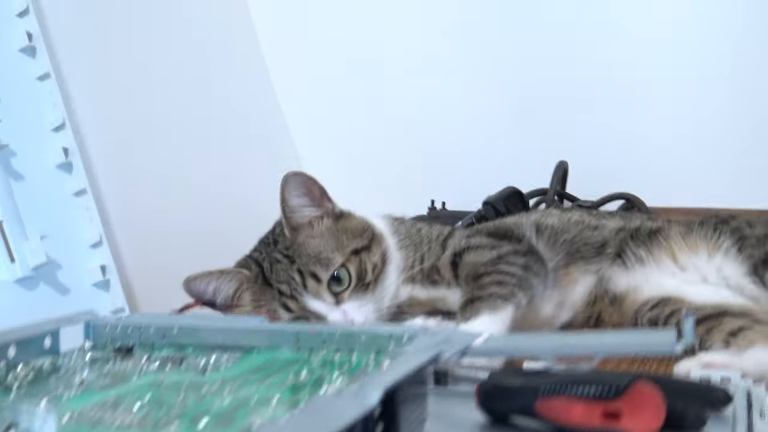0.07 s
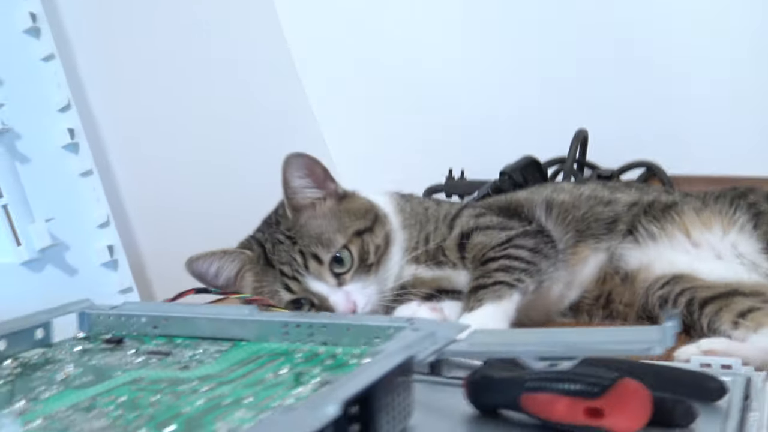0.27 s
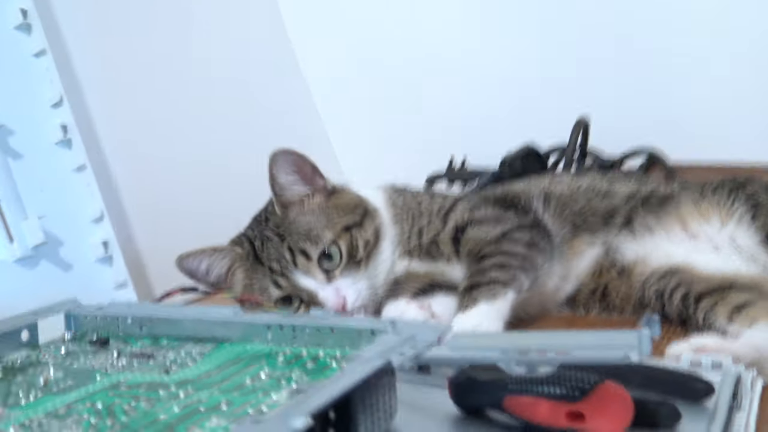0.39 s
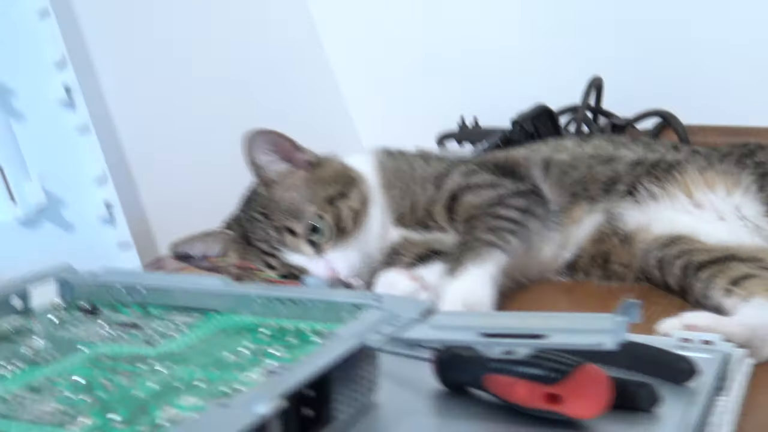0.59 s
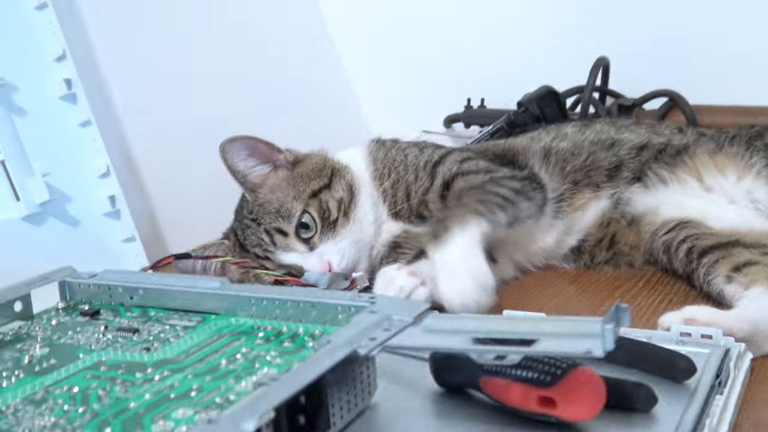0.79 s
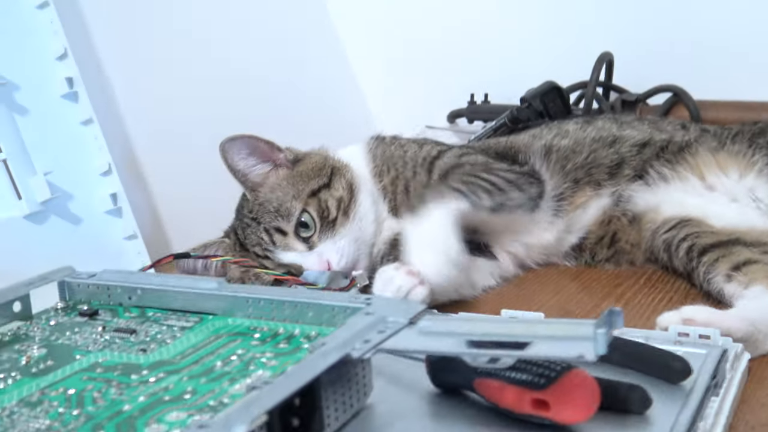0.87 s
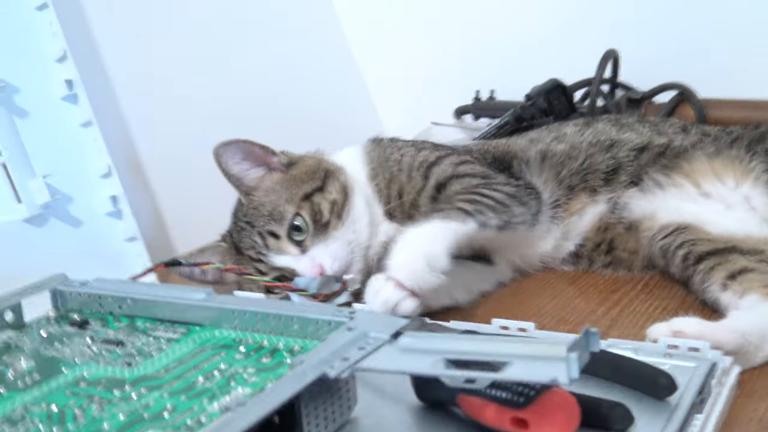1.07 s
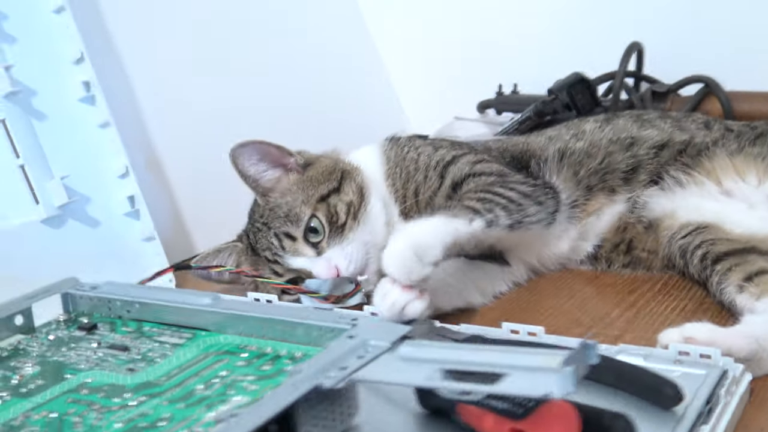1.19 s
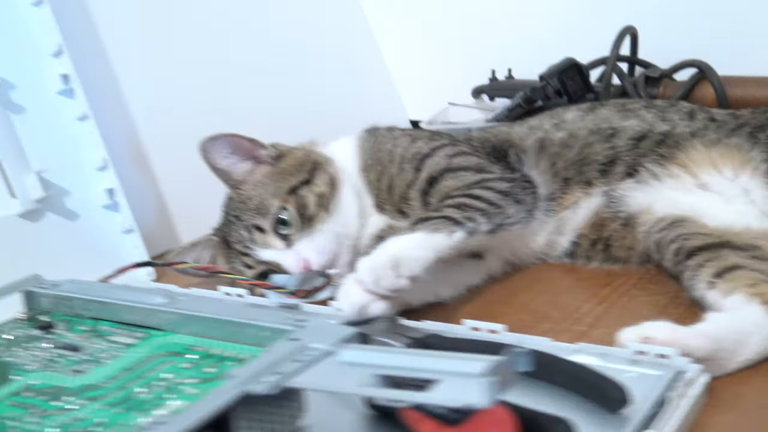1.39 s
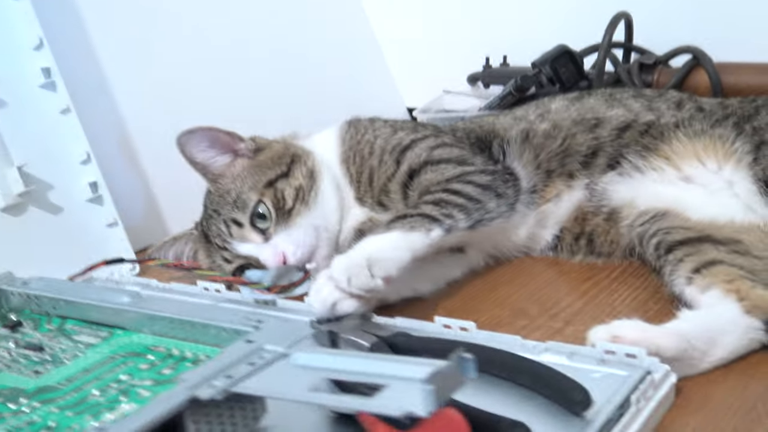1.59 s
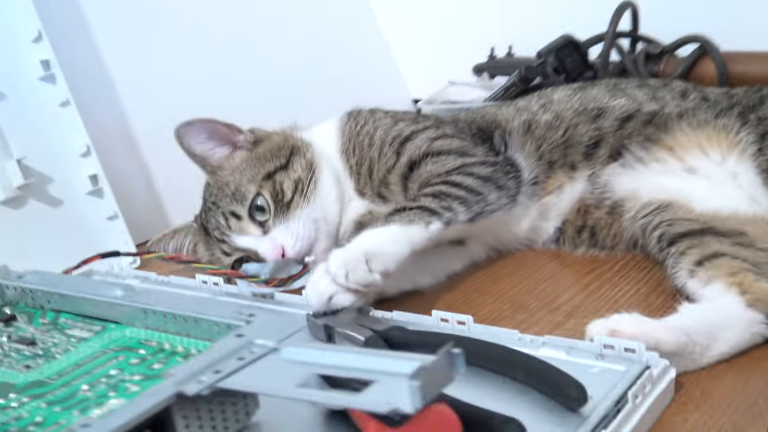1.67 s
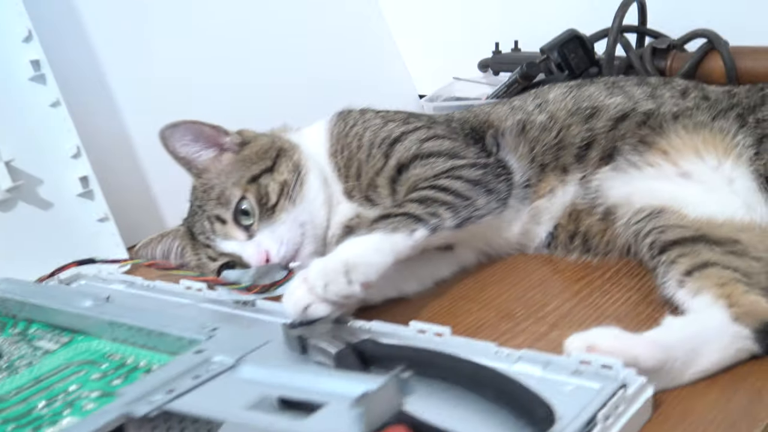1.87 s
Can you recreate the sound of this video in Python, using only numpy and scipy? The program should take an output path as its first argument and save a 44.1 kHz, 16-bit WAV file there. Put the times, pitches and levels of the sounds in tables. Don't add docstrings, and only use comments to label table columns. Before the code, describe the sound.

A sharp, bright metallic snap at 0.2 s, by far the loudest, rings for only milliseconds with slight room echo. Tiny wire ticks follow around 0.35, 0.55 and 0.8. At 0.9-1.0 a paw drags with a low, furry scuff, then hollow plastic taps at 1.04. Dull padded desk knocks come at 1.6 and 1.7. Beneath: soft hum, hiss, rustle, distant fan and faint high pulsing motor whine.

```python
import sys
import numpy as np
from scipy import signal
from scipy.fft import rfft, irfft
from scipy.io import wavfile
from scipy.ndimage import uniform_filter1d

SR = 44100
rng = np.random.default_rng(int(sys.argv[2]) if len(sys.argv) > 2 else 0)


def elevation(decibels):
    levels = np.asarray(decibels, float)
    return 10 ** (levels / 20)


def to_wav(s):
    ch = np.atleast_2d(s).T
    pcm = np.round(np.clip(ch, -1, 1) * 32767)
    wavfile.write(sys.argv[1], SR, pcm.astype(np.int16))


N = 83790
LEAN_DB = np.array([[-0.5], [0.5]])


def evened(x):
    return x / np.sqrt(np.mean(x ** 2) + 1e-20)


def read(points, hz):
    f, value = np.transpose(points)
    return np.interp(np.log(hz + 1), np.log(f + 1), value)


def curve(points):
    return np.interp(np.arange(N) / SR, *np.transpose(points))


def add(mix, start_s, sound):
    part = mix[round(start_s * SR):][:len(sound)]
    part += sound[:len(part)]


def coloured(x, points):
    hz = np.fft.rfftfreq(x.shape[-1], 1 / SR)
    return irfft(rfft(x) * elevation(read(points, hz)), x.shape[-1])


def ring(modes, rise_s, tilt_db=0, sag=0):
    sag_s = 0.0031
    t = np.arange(5000) / SR
    bent = t + sag * sag_s * (1 - np.exp(-t / sag_s))
    pivot_hz = modes[min(1, len(modes) - 1)][0]
    x = np.zeros(len(t))
    for hz, db, t60_s in modes:
        level_db = db + tilt_db * np.log2(abs(hz) / pivot_hz)
        x += elevation(level_db - 60 * t / t60_s) * np.sin(2 * np.pi * hz * bent)
    x = x * np.sin(np.pi / 2 * np.minimum(t / rise_s, 1)) ** 2
    return x / abs(x).max()


def hiss(points, patch_db, swell_db):
    # f/Hz, correlation
    likeness = [(30, 1), (70, 0.96), (200, 0.66), (700, 0.87), (1500, 0.72), (2500, 0.81), (4600, 0.96),
                (5600, 0.3), (15000, 0.91)]
    count, hz = N // 256 + 5, np.fft.rfftfreq(1024, 1 / SR)
    a, b, c, d, patches = rng.standard_normal((count, 513, 5)).T
    patches = uniform_filter1d(patches, size=12, axis=0)
    patches = evened(uniform_filter1d(patches, size=10, axis=1))
    swell = evened(uniform_filter1d(rng.standard_normal(count), size=6))
    same = np.clip(read(likeness, hz), -1, 1)[:, None]
    left = a + 1j * b
    right = same * left + np.sqrt(1 - same ** 2) * (c + 1j * d)
    level_db = read(points, hz)[:, None] + patch_db * patches + swell_db * swell
    z = np.array([left, right]) * elevation(level_db)
    return evened(signal.istft(z, nperseg=1024, noverlap=768)[1][:, :N])


def room_hum():
    # f/Hz, density/dB
    hum_colour = [(20, -12.5), (45, 2), (150, 0.5), (310, -0.5), (450, -3.5), (900, -3.5), (1500, -14),
                  (3500, -17.5), (16000, -18.5)]
    return elevation(-63.5) * hiss(hum_colour, patch_db=1.27, swell_db=0.6)


def rustle():
    # t/s, level/dB
    rustle_level = [(0, -77), (.2, -66.5), (.5, -69.5), (.8, -67), (.9, -61), (1.08, -73.5), (1.25, -78.5),
                    (1.9, -81)]
    # f/Hz, density/dB
    rustle_colour = [(300, 1), (1000, 2), (2500, -13), (6000, -5), (12000, -12.5)]
    return elevation(curve(rustle_level)) * hiss(rustle_colour, patch_db=2.5, swell_db=1.5)


def fan():
    centre_hz, width_hz, level_db = 1164, 40, -74
    t, r = np.arange(N) / SR, np.exp(-np.pi * width_hz / SR)
    z = signal.lfilter([1 - r], [1, -r], rng.standard_normal((N, 2)) @ [1, 1j])
    return elevation(level_db) * evened((z * np.exp(2j * np.pi * centre_hz * t)).real)


def lens_motor():
    # multiple of step tone, level/dB, end t/s
    motor_orders = [(4, -77.5, 0.77), (5, -74.5, 0.77), (6, -80, .76), (7, -87, 0.56)]
    # t/s, level/dB
    motor_load = [(0, -5.5), (.2, 0), (.4, 1.5), (.7, 0), (1.1, 9)]
    tone_hz, steps_per_s, step_on, first_step_s = 1620, 25, 0.45, 0.0005
    t = np.arange(N) / SR
    phase = (t - first_step_s) * steps_per_s
    on = uniform_filter1d(1. * (phase % 1 < step_on), size=90)
    luck = rng.standard_normal((60, 5))[phase.astype(int)]
    turns = np.cumsum(tone_hz * (1 + 0.00084 * luck[:, 4])) / SR
    whine = np.zeros(N)
    for i, (k, db, end_s) in enumerate(motor_orders):
        level_db = db + 1.1 * luck[:, i] - 23 * (t > end_s)
        whine += elevation(level_db) * np.sqrt(2) * np.sin(2 * np.pi * k * turns + i)
    return elevation(curve(motor_load)) * on * whine


def walls(x):
    # f/Hz, t60/s
    wall_decay = [(300, 0.31), (1200, 0.27), (3000, 0.28), (6500, 0.32), (12000, 0.3)]
    # f/Hz, level/dB
    wall_colour = [(300, -1.5), (3500, 7.5), (5300, -1), (6400, 5), (7500, 2), (12000, -7)]
    at = np.arange(120, 22000, 20) + rng.integers(0, 20, (2, 1094))
    taps = np.zeros((2, 22050))
    np.put_along_axis(taps, at, rng.choice([-1., 1.], at.shape), 1)
    taps = np.array([taps[0], 1.08 * taps[0] + 0.5 * taps[1]])
    hz, t, z = signal.stft(taps, SR, nperseg=256)
    tail = signal.istft(z * elevation(-60 * t / read(wall_decay, hz)[:, None]), SR, nperseg=256)[1]
    echo = signal.fftconvolve(x[None], tail / np.linalg.norm(tail[0]), axes=1)[:, :N]
    return elevation(-21) * coloured(echo, wall_colour)


def ports(x):
    # f/Hz, level/dB
    side_level = [(200, -17), (1000, -12.5), (2500, -22), (4500, -17), (6500, -16.5), (9000, -8),
                  (15000, -7)]
    turned = signal.hilbert(x).imag
    side = coloured(0.97 * turned - 0.17 * x, side_level)
    return np.array([x + side, x - side]) * elevation(LEAN_DB)


def drag():
    # t/s, level/dB
    pressure = [(.893, -77), (.902, -55), (.912, -45), (.92, -40.5), (.945, -40.5), (.968, -39),
                (.985, -43.5), (.993, -56), (1.005, -73)]
    # f/Hz, level/dB, t60/s
    board_modes = [(114, -13, 0.028), (167, -4, 0.053), (219, 0, 0.04), (303, 0, 0.051), (367, -2, 0.027),
                   (432, -4, 0.046), (494, 1, 0.06), (720, -16, 0.033)]
    # f/Hz, density/dB
    fur_colour = [(500, -39), (758, -1), (1310, -5.5), (1930, -6.5), (4800, -17), (6500, -12),
                  (8000, -16.5), (10000, -17.5), (16000, -35)]
    # t/s, peak/dB, f/Hz
    catch_events = [
        (0.9002, -45.5, 244),
        (.917, -32, 161.5),
        (0.9283, -32, 267),
        (.938, -40, 456),
        (.9475, -49, 162),
        (0.9546, -35.5, 165),
        (.962, -33, 193),
        (0.9793, -41.5, 412),
    ]
    slips_per_s, slip_spread_db, fur_spread_db = 1100, 2.5, 2.0
    board_db, fur_db, fur_share = -2, -7.5, 0.46
    start, end = (pressure[0][0] - 0.015, -90), (pressure[-1][0] + 0.0059, -90)
    db = curve([start] + list(pressure) + [end])
    top_db = db.max()
    slips = rng.standard_normal(N) * elevation(slip_spread_db * rng.exponential(1, N))
    slips = slips * (rng.random(N) < slips_per_s / SR)
    board = evened(signal.fftconvolve(slips, ring(board_modes, rise_s=0.00076))[:N])
    crackle = rng.standard_normal(N) * elevation(fur_spread_db * rng.exponential(1, N))
    fur = evened(coloured(crackle, fur_colour))
    catches = np.zeros(N)
    for s, peak_db, hz in catch_events:
        add(catches, s, -elevation(peak_db) * ring([(hz, 0, 0.039)], rise_s=0.0049))
    fur_level_db = top_db + fur_share * (db - top_db) + fur_db
    return catches + board * elevation(db + board_db) + fur * elevation(fur_level_db)


def knocks():
    # t/s, peak/dB, tilt/(dB/octave)
    knock_events = [
        (1.599, -44, 6),
        (1.6029, -30, 1.5),
        (1.6905, -40, -2),
        (1.805, -54, -6),
    ]
    # f/Hz, level/dB, t60/s
    desk_modes = [(150, -6.5, 0.045), (279, 6, 0.05), (489, 1, 0.033), (755, -15.5, 0.038),
                  (960, -13, 0.05), (1450, -19, 0.035), (2310, -28, 0.01)]
    out = np.zeros(N)
    for s, db, tilt_db in knock_events:
        add(out, s, -elevation(db) * ring(desk_modes, 0.0022, tilt_db, sag=0.54))
    return out


def plastic_taps():
    # t/s, peak/dB, tilt/(dB/octave)
    tap_events = [
        (1.030, -44.5, 6.5),
        (1.0364, -36.5, 0.5),
        (1.047, -44, 5),
        (1.053, -50.5, 1),
        (1.430, -62, 10),
    ]
    # f/Hz, level/dB, t60/s
    part_modes = [(781, 1.5, 0.026), (911, 3.5, 0.03), (1202, 1, 0.036), (1500, -0.5, 0.03),
                  (2080, -14, 0.027), (2904, -10, 0.021), (3770, -18, 0.02), (4660, -16, 0.013)]
    # f/Hz, level/dB, t60/s
    tube_modes = [(921, 0, .05), (1500, -2, .035)]
    out = np.zeros(N)
    add(out, 1.4290, elevation(-48) * ring(tube_modes, rise_s=0.003))
    for s, db, tilt_db in tap_events:
        add(out, s, elevation(db) * ring(part_modes, 0.0024, tilt_db))
    return out


def tick(hz, width_hz, t60_s):
    t = np.arange(2000) / SR
    crackle = rng.standard_normal(2000) * elevation(-60 * t / t60_s) * np.minimum(t / 0.00054, 1)
    crackle[8] += 2.8
    r = np.exp(-np.pi * width_hz / SR)
    poles = [1, -2 * r * np.cos(2 * np.pi * hz / SR), r * r]
    for _ in range(2):
        crackle = signal.lfilter([1, 0, -1], poles, crackle)
    return crackle / abs(crackle).max()


def wire_ticks():
    # t/s, peak/dB, centre f/Hz, width/Hz, t60/s
    tick_events = [(0.2085, -19.5, 5950, 8900, 0.005), (.2095, -37.5, 4800, 8850, 0.15),
                   (.125, -57, 4000, 5000, 0.027), (0.327, -54.5, 1780, 2000, 0.074),
                   (0.3621, -46.5, 3509, 3000, 0.0087), (0.5424, -47.5, 1870, 1500, 0.013),
                   (0.541, -50, 5500, 7000, 0.0065), (0.816, -38.5, 4540, 2800, 0.014),
                   (0.8164, -39, 7800, 3020, 0.012), (0.817, -44.5, 1580, 1500, 0.025),
                   (.8745, -49, 7900, 6000, 0.006), (0.8898, -44, 7500, 6000, 0.0047),
                   (.8997, -49, 6300, 7000, .01), (0.9075, -48, 7000, 7000, 0.0072),
                   (.9162, -43, 2500, 4000, 0.014), (.918, -50, 6700, 1500, .01),
                   (1, -35, 6900, 5870, 0.014), (0.9979, -44.5, 3000, 3000, 0.025),
                   (1.025, -52.5, 8500, 3000, 0.029), (1.577, -48, 2370, 2460, 0.039),
                   (1.5774, -51.5, 6250, 4000, 0.019), (1.6076, -52.5, 6650, 1500, 0.011),
                   (1.604, -49, 2200, 2500, 0.04), (1.644, -43, 3770, 2950, 0.011),
                   (1.72, -60, 2500, 2950, 0.011), (1.8674, -49.5, 980, 500, 0.022),
                   (1.373, -64, 1183, 120, 0.044), (0.327, -53, 1150, 250, 0.071),
                   (.736, -48, 248, 500, 0.022), (0.834, -55.5, 198, 295, 0.36),
                   (1.029, -47.5, 350, 400, 0.017)]
    out = np.zeros(N)
    for s, db, hz, width_hz, t60_s in tick_events:
        add(out, s, elevation(db) * tick(hz, width_hz, t60_s))
    return out


def snap():
    # f/Hz (minus: first swing inward), level/dB, t60/s
    frame_modes = [(825, -33.5, 0.065), (988, -16.5, 0.016), (1244, -15.5, 0.022), (2987, -22.5, 0.026),
                   (3271, -15.5, 0.013), (3849, -11.5, 0.012), (4923, -16, .012), (6481, 3.5, 0.0047),
                   (-7250, -10.5, 0.0061), (8308, -9.5, 0.0036), (10462, -11, 0.0046),
                   (-11700, -7.5, 0.0042), (15640, -21, 0.0046)]
    snap_s, snap_db, crack_db, cut_hz = 0.2081, -7.5, -6.5, 510
    metal, crack = np.zeros((2, N))
    add(metal, snap_s, elevation(snap_db) * ring(frame_modes, rise_s=0.00061))
    add(crack, snap_s, elevation(crack_db) * tick(4000, 9900, 0.0011))
    thin = signal.butter(2, cut_hz, "high", fs=SR, output="sos")
    return signal.sosfilt(thin, metal), crack


def scene():
    floor = room_hum() + rustle()
    bass_cut = signal.butter(3, 76, "high", fs=SR, output="sos")
    paws = wire_ticks() + plastic_taps() + drag()
    near, pads = signal.sosfilt(bass_cut, [paws, knocks()])
    metal, crack = snap()
    direct = ports(near + metal + lens_motor() + fan())
    direct = direct + pads * elevation([[-1.5], [1.5]])
    return direct + walls(near + pads + crack) + floor * elevation(LEAN_DB)


def low_pass(x):
    return signal.sosfilt(signal.butter(12, 16820, fs=SR, output="sos"), x)


def record(dry):
    edge = signal.firwin(255, 15650, window=("kaiser", 8), fs=SR)
    mix = signal.oaconvolve(dry, edge[None], "same")
    return low_pass(mix)


dry = scene()
out = record(dry)
to_wav(out)
```